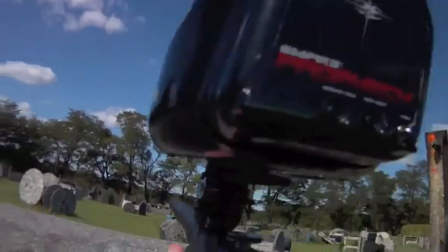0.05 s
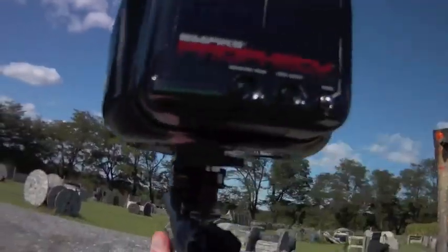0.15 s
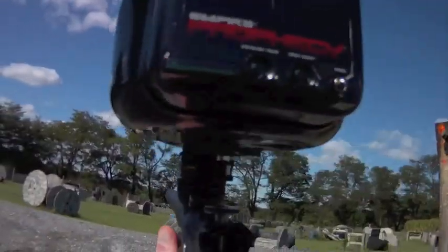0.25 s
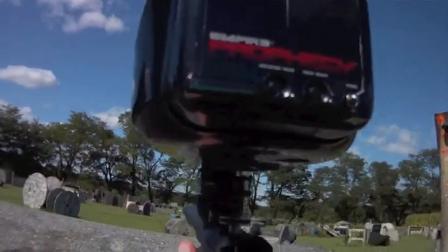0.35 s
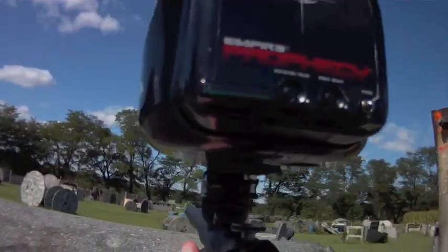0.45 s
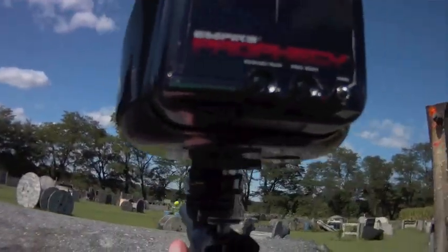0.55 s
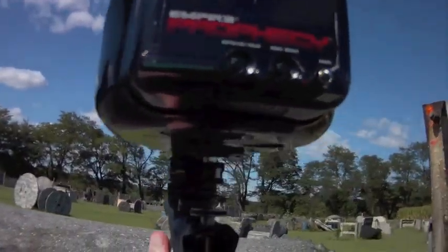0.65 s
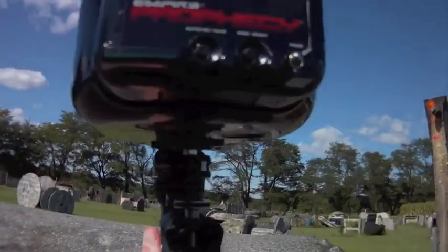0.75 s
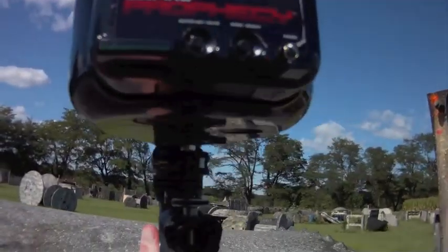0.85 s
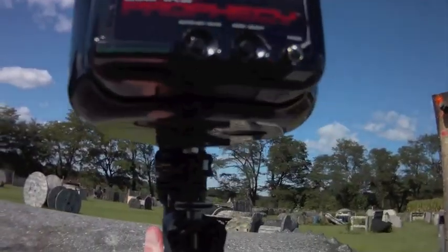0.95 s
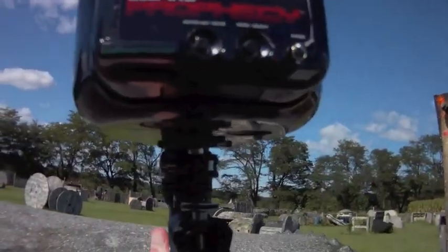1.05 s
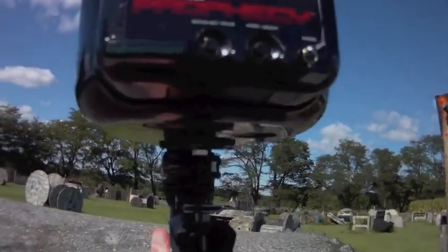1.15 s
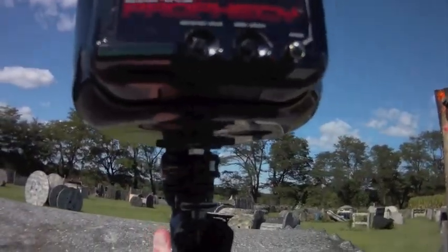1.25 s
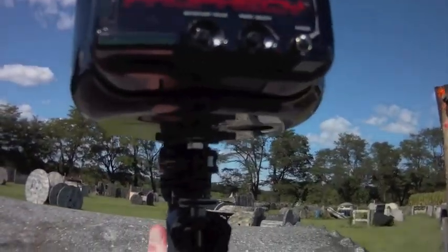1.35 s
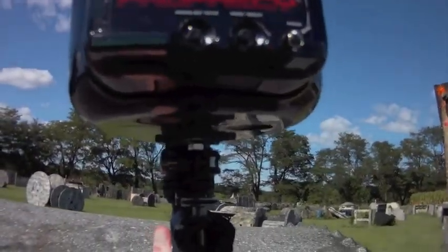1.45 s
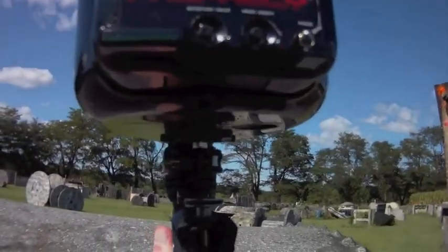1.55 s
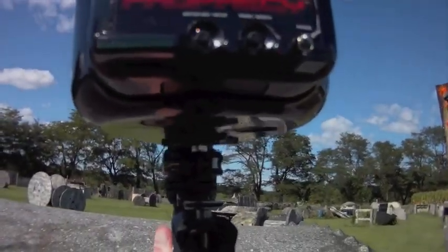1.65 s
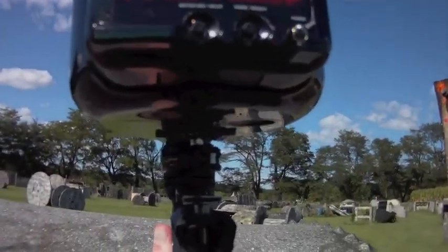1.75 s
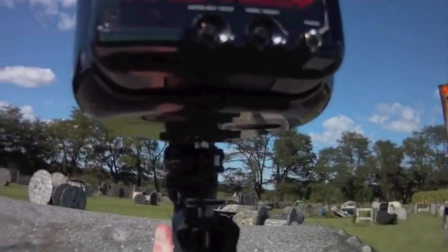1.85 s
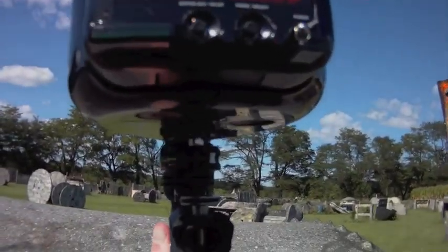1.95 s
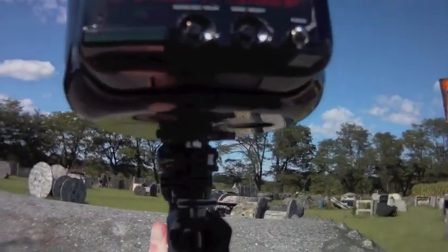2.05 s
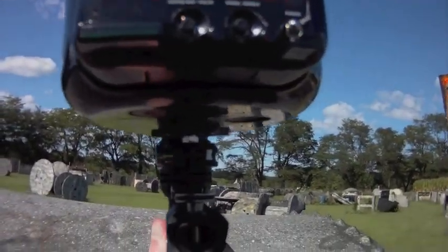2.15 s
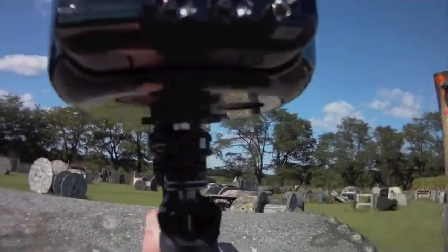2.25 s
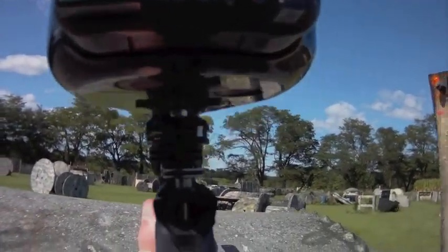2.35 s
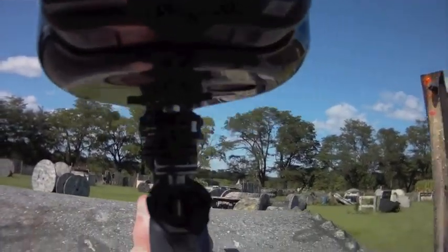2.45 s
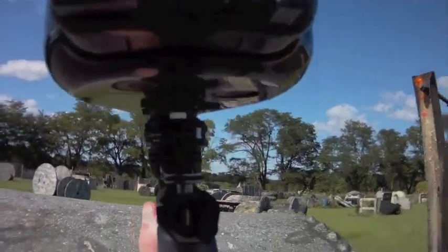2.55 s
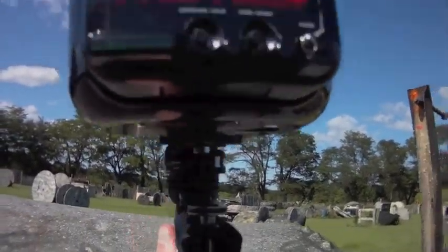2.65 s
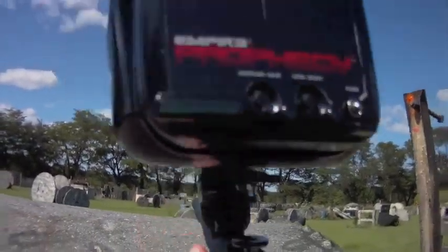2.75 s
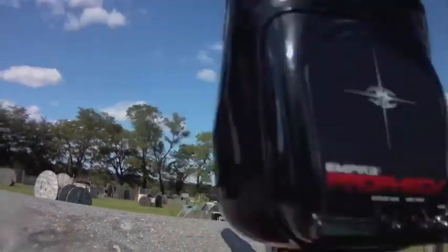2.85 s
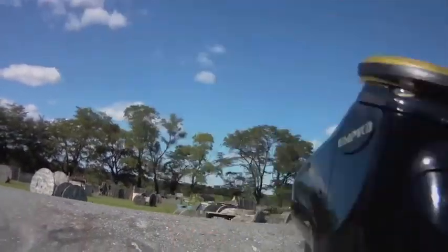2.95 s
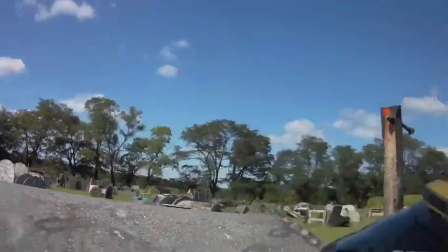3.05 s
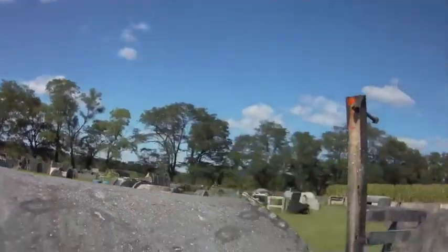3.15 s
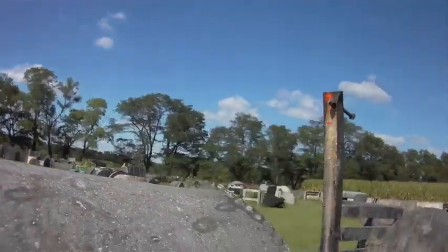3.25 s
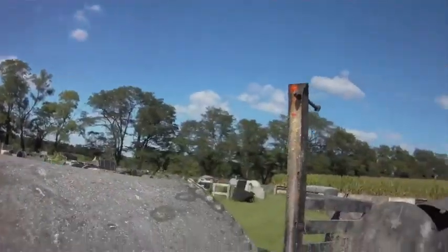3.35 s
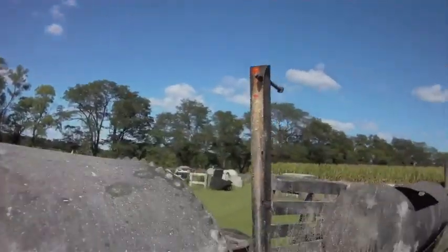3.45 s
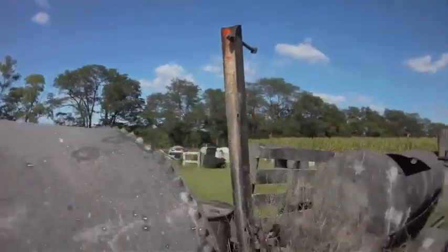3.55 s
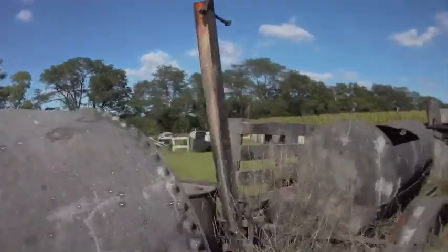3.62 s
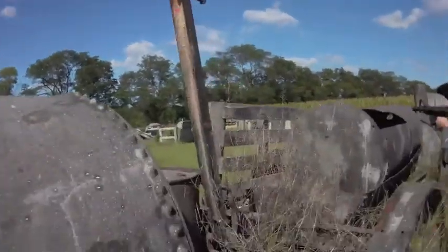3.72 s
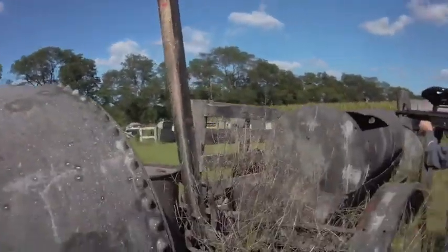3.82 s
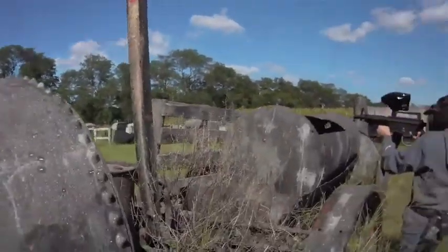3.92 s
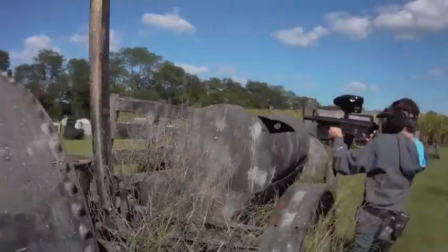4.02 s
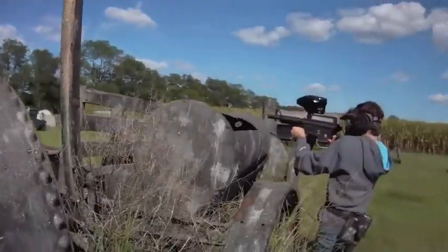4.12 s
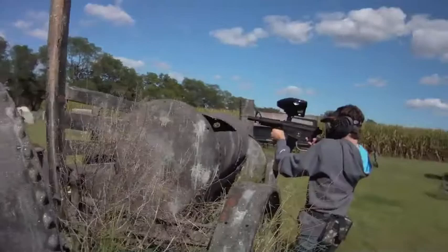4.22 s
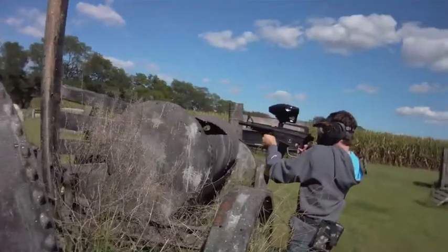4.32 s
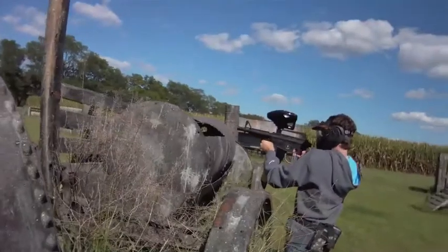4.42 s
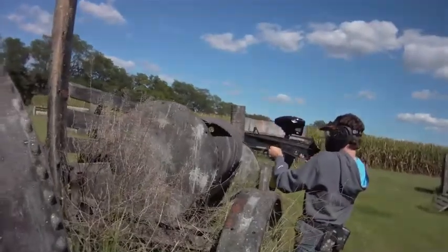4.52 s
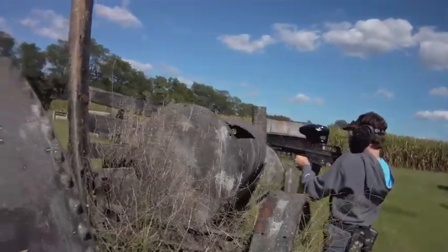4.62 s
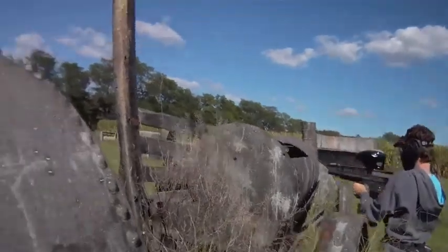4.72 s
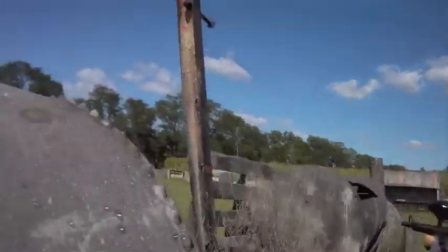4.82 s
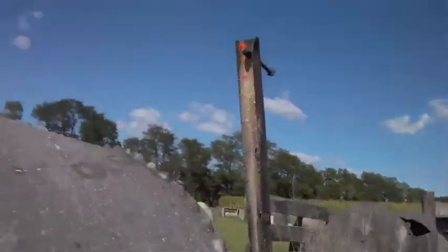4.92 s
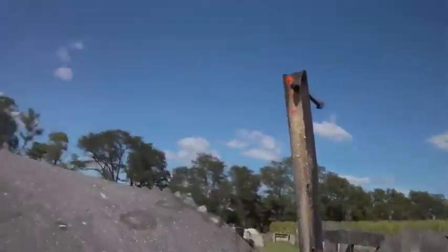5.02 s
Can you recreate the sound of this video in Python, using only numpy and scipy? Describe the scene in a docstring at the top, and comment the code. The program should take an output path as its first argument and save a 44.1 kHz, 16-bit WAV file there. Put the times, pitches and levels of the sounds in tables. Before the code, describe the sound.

An open field ringed by trees, heard from a microphone worn close to the shooter. An earlier shot's echo and a brief cloth rub open the scene. From 0.17 to 2.4 seconds a near paintball marker fires thirteen almost identical shots, about five a second: tiny double valve click, loud bright air blast with a short metallic ring, then a bolt clack some 30 milliseconds later and faint ball rattle. At 1.04 seconds a neighbour's marker joins at a similar pace, drifting in and out of step, with hollow mid-pitched thumps, puffs and mostly muted cracks. After 2.4 it fires alone; its thump turns lower around 3.2-3.4, and cracks sharpen from 3.8 until the last shot at 4.2. Patchy echoes from the trees trail each shot for about half a second. Cloth rustles near 3.5, and soft gear knocks occur around 2.5, 2.7 and 4.97. Quiet air and a very faint wavering engine hum remain.

```python
"""An electronic paintball marker fires about five shots a second close by, on a field ringed by trees.
Each cycle is two valve clicks, an air blast and the clack of the returning bolt: filtered noise bursts
and damped modes. A neighbour's marker joins in with puffs, thumps and cracks, and fires on alone while
the head turns towards it. The tree line returns patchy noise tails, short hard knocks and soft swells
are shaped noise, and a far engine hums as gently wavering sine lines over still air."""
import sys
import numpy as np
from scipy import signal
from scipy.fft import rfft, irfft, next_fast_len
from scipy.io import wavfile
from scipy.ndimage import map_coordinates

SR = 44100
rng = np.random.default_rng(int(sys.argv[2]) if len(sys.argv) > 2 else 0)


def to_wav(sig):
    """Store sig (one row per channel, or 1-D mono) as 16-bit WAV at the path in sys.argv[1].

    Samples outside -1..1 are clipped; the rate is SR.
    """
    pcm = np.clip(np.atleast_2d(sig), -1, 1) * 32767
    pcm = np.round(pcm).astype(np.int16)
    wavfile.write(sys.argv[1], SR, pcm.T)  # frames by channels


N = 223807  # length in samples
T = np.arange(SR // 4) / SR  # time since a blow, s


def amp(db):
    """Level: decibels to amplitude ratio."""
    return 10 ** (np.asarray(db) / 20)


def along(points, hz):
    """Interpolation of (frequency, value) points along a logarithmic frequency axis."""
    f, v = np.transpose(points)
    return np.interp(np.log(hz + 1), np.log(f), v)


def wobble(rate, size=N):
    """Slow random modulation: a smooth curve through `rate` random knots a second."""
    knots = rng.standard_normal(size // 40)
    return map_coordinates(knots, [np.arange(size) * rate / SR], mode="wrap")


def colour(x, spectrum, size=4096):
    """Minimum-phase filtering: a causal kernel of unit energy with the given spectrum."""
    hz = np.fft.rfftfreq(size, 1 / SR)
    cepstrum = irfft(np.log(amp(along(spectrum, hz))))
    # folding the cepstrum onto positive time makes the filter causal
    cepstrum[1:size // 2] *= 2
    cepstrum[size // 2 + 1:] = 0
    kernel = irfft(np.exp(rfft(cepstrum)))
    kernel /= np.linalg.norm(kernel)
    return signal.oaconvolve(x, kernel)[:len(x)]


def add(track, s, sound):
    """Superposition: mix a sound into the track at s seconds."""
    start = round(s * SR)
    part = sound[max(-start, 0):max(N - start, 0)]
    track[max(start, 0):][:len(part)] += part


def fade(t, t60):
    """Exponential decay: 60 dB down after t60 seconds."""
    return np.exp(-np.log(1000) * np.maximum(t, 0) / t60)


def burst(rise, hold, t60):
    """Turbulence: white noise that swells, holds and dies (all times in s)."""
    swell = 1 - np.exp(-T / rise)
    return rng.standard_normal(len(T)) * swell * fade(T - hold, t60)


def ring(hz, t60):
    """Damped resonance: one decaying mode, its pitch slightly new at every blow."""
    return np.sin(2 * np.pi * hz * rng.normal(1, .022) * T) * fade(T, t60)


# the near marker's air blasts; regulated air makes every shot alike: start_s
SHOTS = [0.1656, 0.3626, 0.5512, 0.7285, 0.9094, 1.0891, 1.2689, 1.443, 1.6239, 1.8177, 2.0048, 2.1984,
         2.3923]
# spectra of the valve clicks, the air blast and the bolt: frequency_hz, relative level_db
VALVE_SPECTRUM = [(100, -19), (500, -6), (950, -19), (1800, -10), (2550, -0.5), (3100, -10), (4100, 1.5),
                  (5000, -15.5), (6500, -16), (15000, -32)]
BLAST_SPECTRUM = [(100, -21.5), (600, -16), (1000, -20), (1500, -9.5), (1700, -6), (2350, 3), (2950, -7.5),
                  (3600, 3.5), (4400, -3), (5000, -13.5), (6500, -19.5), (8400, -10), (11000, -18),
                  (15000, -25)]
BOLT_SPECTRUM = [(100, -32.5), (280, -24), (470, -11.5), (1000, -23), (1900, -9), (2650, 3.5), (4000, -6.5),
                 (5200, -18.5), (9500, -14), (15000, -19)]
BLAST_DB, BOLT_DB = -7.5, -15.5  # the air blast, the returning bolt
# the bolt's return time, how much quicker it is on full pressure, how fast the pressure settles
RETURN_S, FRESH_LEAD_S, SAG_S = .03, .003, .3


def near_marker():
    """Gas release and impact: valve clicks, air blast and barrel thump, then the bolt and the next ball."""
    valve, blast, bolt, body = np.zeros((4, N))
    for s in SHOTS:
        add(valve, s - .0205, amp(-31.5) * burst(rise=0.00044, hold=0.0033, t60=.014))  # the solenoid trips
        # the bolt slides forward
        add(valve, s - .012, amp(-30) * burst(rise=0.00091, hold=0.0034, t60=0.021))
        add(body, s - .013, amp(-31.5) * ring(hz=463, t60=0.029))

        blast_noise = burst(rise=0.000091, hold=0.0019, t60=0.036) * fade(T - .0055, 0.022)
        add(blast, s - .0002, amp(BLAST_DB) * blast_noise)
        # the breech vents
        add(blast, s + 0.0049, amp(BLAST_DB - 25) * burst(rise=0.0014, hold=0.0049, t60=0.056))
        add(body, s, amp(BLAST_DB - 4) * struck_metal(damping=1.12))

        # low rings: a pair at the blast, a lower one 7.6 ms after
        add(body, s - .0005, amp(-11) * -ring(hz=536.3, t60=0.035))
        add(body, s + .0005, amp(-22.5) * ring(hz=681, t60=.04))
        add(body, s + 0.007615, amp(-14.5) * ring(hz=406.4, t60=0.035))
        recoil = ring(hz=140.4, t60=0.028) * (1 - np.exp(-T / 0.0026))
        add(body, s + 0.0017, amp(-11.5) * recoil)

        # the bolt slows as the pressure sags
        home = s + RETURN_S - FRESH_LEAD_S * np.exp((SHOTS[0] - s) / SAG_S)
        add(bolt, home, amp(BOLT_DB) * burst(rise=.0001, hold=.001, t60=0.011))
        add(body, home, amp(BOLT_DB - 12.5) * struck_metal(damping=1.2))
        # the housing rattles
        add(bolt, home + 0.0038, amp(BOLT_DB - 15.5) * burst(rise=0.0011, hold=.003, t60=0.03))
        add(body, home + .001, amp(-28) * ring(hz=470, t60=.07) * (1 - np.exp(-T / 0.0018)))

        for lag in rng.uniform(0.081, 0.084, size=2):  # balls settle in the feed neck
            ball_db = -44 + rng.normal(0, 2.2)
            add(valve, s + lag, amp(ball_db) * burst(rise=0.00093, hold=0.00076, t60=0.023))
    clicks_and_blast = colour(valve, VALVE_SPECTRUM) + colour(blast, BLAST_SPECTRUM)
    return clicks_and_blast + colour(bolt, BOLT_SPECTRUM) + body


# modes of the near marker's body and barrel: pitch_hz, level_db, t60_s (before extra damping)
METAL_MODES = [(1710, -9, 0.042), (2163, -2, 0.029), (2458, -1, .022), (3515, -2.5, 0.027),
               (4006, -2.5, 0.034), (4208, -6.5, 0.031), (4470, -7.5, .03), (8260, -7, .018)]


def struck_metal(damping):
    """Modal synthesis: the marker's modes, with slightly new strengths and pitches at every blow."""
    total = np.zeros(len(T))
    for k, (hz, db, t60) in enumerate(METAL_MODES):
        gain = (-1) ** k * amp(db + rng.normal(0, 2.2))  # neighbouring modes start in opposite phase
        pitch_hz = hz * rng.normal(1, .004)
        total += gain * np.sin(2 * np.pi * pitch_hz * T) * fade(T, t60 / damping)
    return total


# the neighbour's shots: start_s, crack level_db (sets the crack and how hidden the muzzle is)
NEIGHBOUR_SHOTS = [(1.0359, -22), (1.2316, -19.5), (1.4307, -20), (1.622, -20), (1.82, -20), (2.004, -22),
                   (2.2111, -11.5), (2.3812, -20.5), (2.568, -21.5), (2.788, -23.5), (3.0012, -27),
                   (3.2058, -23), (3.4271, -12), (3.6137, -18.5), (3.8143, -9), (4.0063, -9.5),
                   (4.213, -8.5)]
# spectra of the puff, the bolt's clack, the nearby scatter and the low boom: frequency_hz, relative level_db
PUFF_SPECTRUM = [(50, -36.5), (120, -19), (220, -19.5), (600, -4.5), (1050, -18.5), (1600, -9.5),
                 (2300, -2.5), (2700, 0.5), (3100, -5.5), (3900, 2.5), (5000, -14), (6900, -9.5),
                 (8000, -18), (10500, -16.5), (15000, -27)]
CLACK_SPECTRUM = [(100, -30), (1200, -20), (2600, -2), (4000, 0.5), (5000, -12), (6600, -7.5),
                  (10500, -10.5), (15000, -17.5)]
SCATTER_SPECTRUM = [(50, -28.5), (110, -9.5), (200, -19), (380, -0.5), (620, 6.5), (1000, -15.5),
                    (1700, -8), (2600, -5.5), (3100, -12), (3950, 0), (4900, -14), (7000, -12),
                    (8200, -20.5), (15000, -25.5)]
BOOM_SPECTRUM = [(40, -14), (80, 1), (130, -2), (260, -4), (450, -13), (1500, -44)]
PUFF_DB, THUMP_DB = -19, -5.5  # the air puff, the first barrel thump
THUMP_SAG_DB_PER_S = 1.3  # the thump weakens along the string of shots
THUMP_AWAY_HZ, THUMP_FACING_HZ = 618, 480  # with the head turned away from the neighbour, and towards
TURN_S, TURN_LENGTH_S = 3.2, .24  # when the head swings towards the neighbour, how long it takes


def neighbour_marker():
    """Screening: puff and thump carry on, while the sharp crack weakens when the muzzle is hidden."""
    air, bolt, scatter, boom, tones = np.zeros((5, N))
    swell = (1 - np.exp(-T / 0.0015)) ** 2
    for s, crack_db in NEIGHBOUR_SHOTS:
        facing = np.clip((s - TURN_S) / TURN_LENGTH_S, 0, 1)
        thump_hz = THUMP_AWAY_HZ + facing * (THUMP_FACING_HZ - THUMP_AWAY_HZ)
        thump_db = THUMP_DB - THUMP_SAG_DB_PER_S * (s - NEIGHBOUR_SHOTS[0][0])
        hidden = np.clip((-9.5 - crack_db) / 12, 0, 1)  # how far the muzzle is screened

        add(air, s - .023, amp(-44) * burst(rise=0.0011, hold=.004, t60=0.074))  # the solenoid trips
        # air leaks past the ball
        add(air, s - .002, amp(-29) * burst(rise=0.00088, hold=0.00091, t60=.01))
        # the crack: noise and two short tones
        add(air, s, amp(crack_db - 2) * burst(rise=.0001, hold=0.0013, t60=0.0041))
        crack_tones = ring(hz=2520, t60=0.0075) - ring(hz=3800, t60=0.0065)
        add(tones, s, amp(crack_db + 6 - 6.8 * hidden) * crack_tones)
        add(air, s + .0015, amp(PUFF_DB) * burst(rise=.0003, hold=.003, t60=0.013))
        # the bolt returns
        add(bolt, s + .0138, amp(-26 - 2.5 * hidden) * burst(rise=0.00044, hold=0.0024, t60=.018))

        # the thump, the barrel's upper and lower notes, then a hollow bunker that rings on
        add(tones, s - .001, amp(thump_db) * ring(hz=thump_hz, t60=0.034) * swell)
        add(tones, s - .001, amp(thump_db - 11 + 3 * facing) * ring(hz=674, t60=.028) * swell)
        add(tones, s - .002, hidden * amp(-16) * ring(hz=356.4, t60=.032) * swell)
        add(tones, s + .004, hidden * amp(-36.5) * ring(hz=394, t60=.3) * swell)

        # bunkers and ground close by scatter the sound in clumps
        clumps = amp(3.4 * wobble(rate=400, size=len(T)))
        scattered = clumps * burst(rise=0.0017, hold=.007, t60=0.13)
        add(scatter, s + .005, amp(-28.5 - 3 * hidden) * scattered)
        # a slap from a farther bunker
        add(scatter, s + .093, amp(-56) * burst(rise=0.0013, hold=.01, t60=.08))
        # the muzzle's low push, then its boom rolling over the ground
        add(boom, s, amp(-39) * burst(rise=.001, hold=.004, t60=.03))
        add(boom, s + .012, amp(-47 - 6 * hidden) * burst(rise=0.0023, hold=0.012, t60=.3))
    direct = colour(air, PUFF_SPECTRUM) + colour(bolt, CLACK_SPECTRUM) + tones
    return direct + colour(scatter, SCATTER_SPECTRUM) + colour(boom, BOOM_SPECTRUM)


# spectrum of the sound sent back by the tree line: frequency_hz, relative level_db
TREE_SPECTRUM = [(50, -29), (110, -15.5), (220, -15.5), (350, 0), (460, 3.5), (700, -5), (1000, -16),
                 (1350, -8.5), (1700, -17.5), (2400, -9.5), (2950, -16), (4100, -12.5), (5000, -32.5),
                 (14000, -42)]


def tree_echo(times, db, build, t60, patchy_db):
    """Diffuse reflection: each shot comes back from many trunks, in uneven clumps."""
    t = np.arange(SR) / SR
    swell = 1 - np.exp(-(t / build) ** 2)
    echo = np.zeros(N)
    for s in times:
        clumps = amp(patchy_db * wobble(rate=99.8, size=SR))
        add(echo, s, rng.standard_normal(SR) * clumps * swell * fade(t, t60))
    return amp(db) * colour(echo, TREE_SPECTRUM)


# short hard knocks: loose gear, and at 1.045 s the neighbour's bolt: start_s, level_db
KNOCKS = [(.978, -36), (1.045, -32.5), (2.328, -44), (2.512, -35.5), (2.738, -35.5), (4.972, -49.5)]
# soft noise swells: cloth rubbing, and a long low wash of echo under the shots: start_s, length_s, level_db
SWELLS = [(0, 0.069, -49.5), (1.0, 1.52, -57), (2.95, 0.16, -57.5), (3.48, .33, -45), (5.02, 0.11, -65)]
# spectra of the knocks and of the swells: frequency_hz, relative level_db
KNOCK_SPECTRUM = [(60, -12), (200, -2.5), (400, 3.5), (1000, -14.5), (2300, -4), (3100, -11), (4100, -4),
                  (5000, -16.5), (15000, -33)]
SWELL_SPECTRUM = [(50, -33), (250, -17.5), (460, -0.5), (750, -11), (1050, -21), (1400, -18), (1850, -24),
                  (2900, -14), (4500, -31.5), (15000, -53.5)]
SWELL_RISE_DB_PER_S, SWELL_FALL_DB_PER_S = 110, 130  # how fast a swell grows and dies


def knocks_and_swells():
    """Impact and amplitude modulation: short hard knocks, and grainy noise that swells, holds and dies."""
    knocks = np.zeros(N)
    for s, db in KNOCKS:
        add(knocks, s, amp(db) * burst(rise=0.0011, hold=0.0027, t60=0.06))
    t = np.arange(N) / SR
    envelope = np.zeros(N)
    for s, length, db in SWELLS:
        before_db = SWELL_RISE_DB_PER_S * np.maximum(s - t, 0)
        after_db = SWELL_FALL_DB_PER_S * np.maximum(t - s - length, 0)
        envelope += amp(db - before_db - after_db)
    grain = amp(1.2 * wobble(rate=39) + 2 * wobble(rate=160))
    swells = envelope * grain * rng.standard_normal(N)
    return colour(knocks, KNOCK_SPECTRUM) + colour(swells, SWELL_SPECTRUM)


# lines of the far engine's hum: pitch_hz, level_db (before the common wavering gain)
ENGINE_LINES = [(107.7, -75.5), (323.0, -69.5), (425.3, -79.5), (484.5, -84), (532.9, -78.5), (646.0, -70)]
# spectrum of the still air: frequency_hz, relative level_db
AIR_SPECTRUM = [(25, -25.5), (100, -12.5), (260, -14), (370, -10.5), (650, -11.5), (1000, -20.5),
                (4000, -20), (10000, -28.5), (15000, -26.5)]


def background():
    """Additive synthesis over noise: a far engine's lines waver together above the still air."""
    t = np.arange(N) / SR + 0.00012 * wobble(rate=4)  # a shared time wander, s
    hum = sum(amp(db) * np.sin(2 * np.pi * hz * t) for hz, db in ENGINE_LINES)
    hum_gain = amp(1.5 + 1.3 * wobble(rate=4))
    still_air = amp(-68) * colour(rng.standard_normal(N), AIR_SPECTRUM)
    return hum_gain * hum + still_air


EARLIER_SHOT_S = -.035  # only its echo is still in the air


def scene():
    """Superposition: both markers, their echoes and the quiet field."""
    near_times = [EARLIER_SHOT_S] + list(SHOTS)
    neighbour_times = [row[0] for row in NEIGHBOUR_SHOTS]
    echoes = tree_echo(near_times, db=-35, build=0.046, t60=0.52, patchy_db=4)
    echoes += tree_echo(neighbour_times, db=-44.5, build=0.025, t60=0.55, patchy_db=3)
    return (near_marker() + neighbour_marker() + echoes + knocks_and_swells() + background())[None]


def record(dry):
    """Saturation and band limiting: tall peaks are rounded, deep bass thinned, the top cut steeply."""
    ceiling, bass_cut_hz, top_hz = .9, 60, 15500
    squashed = dry / (1 + np.abs(dry / ceiling) ** 4) ** (1 / 4)
    size = next_fast_len(N + SR // 2)
    hz = np.fft.rfftfreq(size, 1 / SR)
    bass_cut = (1j * hz / (bass_cut_hz + 1j * hz)) ** 2
    top_cut = 1 / np.sqrt(1 + (hz / top_hz) ** 120)
    return irfft(rfft(squashed, size) * bass_cut * top_cut, size)[..., :N]


dry = scene()
out = record(dry)
to_wav(out)
```